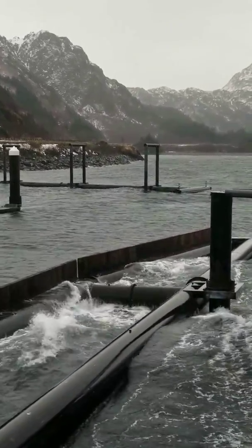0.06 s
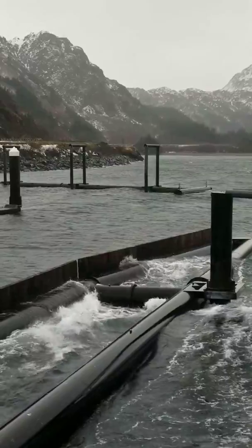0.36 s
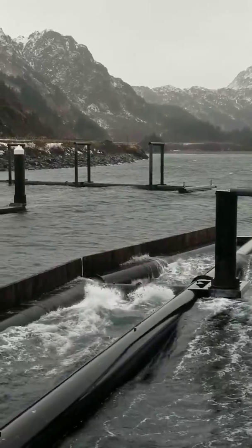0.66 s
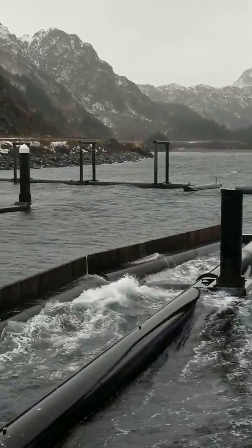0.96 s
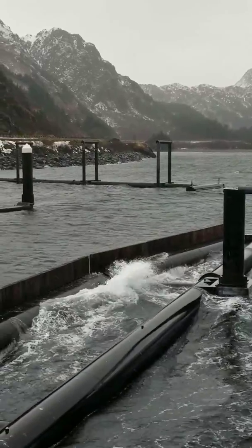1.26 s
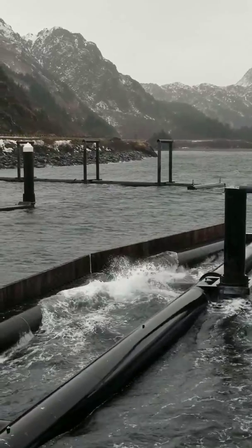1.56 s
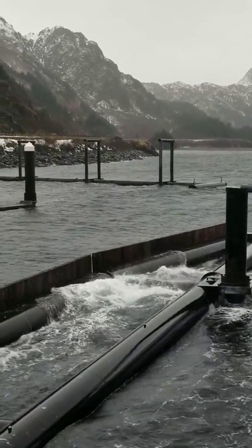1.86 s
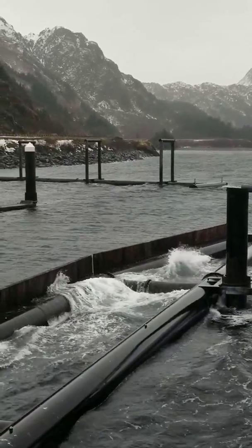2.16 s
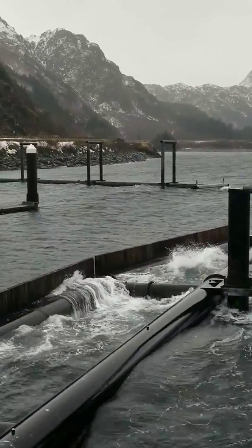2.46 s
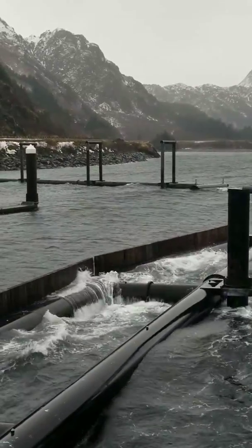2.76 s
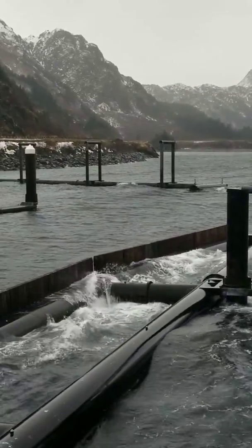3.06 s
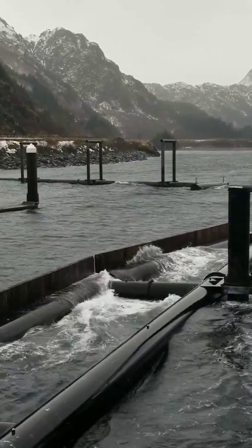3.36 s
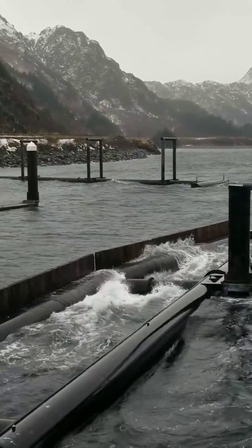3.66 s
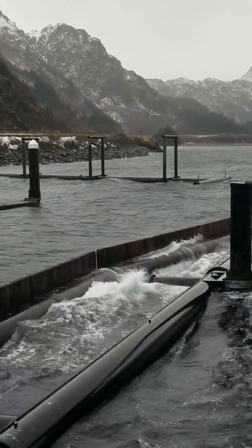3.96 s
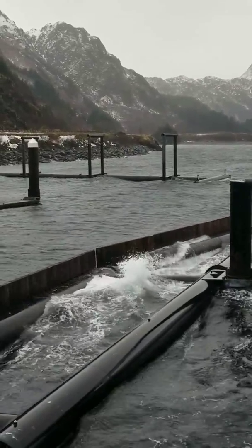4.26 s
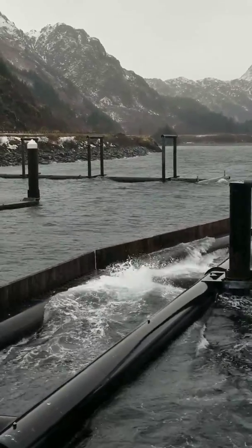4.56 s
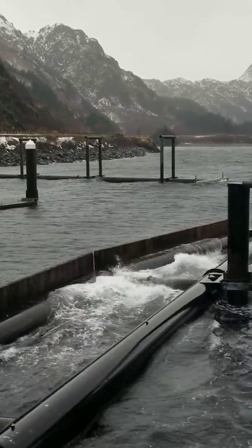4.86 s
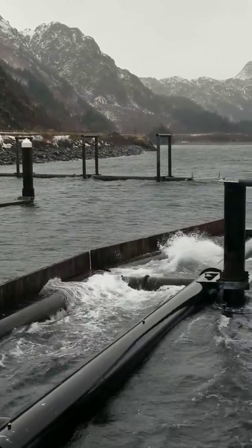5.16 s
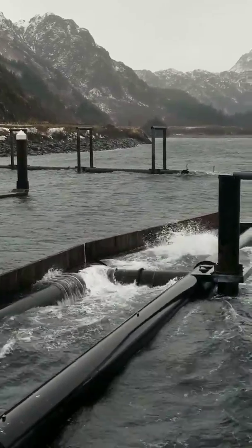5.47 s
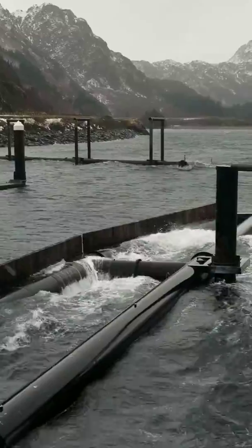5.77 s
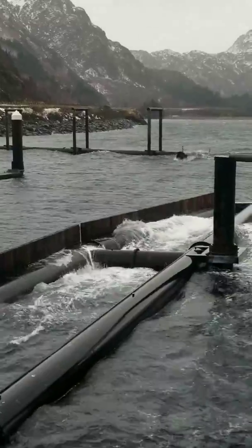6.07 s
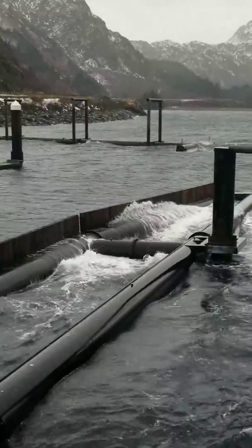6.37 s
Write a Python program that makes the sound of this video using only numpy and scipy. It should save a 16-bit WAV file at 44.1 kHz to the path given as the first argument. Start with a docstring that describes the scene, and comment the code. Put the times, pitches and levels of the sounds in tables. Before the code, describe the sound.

Wind buffets a phone microphone at the shore, rumbling and thumping in uneven gusts. In front, a choppy sea washes over floating pipes with splashes, gurgling bubbles and fizzing foam. Gusts hit about one and two seconds in, the splashing swells around three, and the hardest wind rasps and sputters around four seconds. The wind then eases, leaving the wash, before a last short gust.

```python
"""Gusty wind rumbles on a phone's microphone, over a choppy sea heard from the shore.
Gusts buffet the two microphone openings (ports): single swirls of air (eddies) thump,
the fastest ones sputter, and hard gusts roar and rasp. The sea washes over floating pipes
beside a breakwater, and each wave spills into splashes, ringing bubbles and fizzing foam."""
import sys
import numpy as np
from scipy import signal
from scipy.fft import rfft, irfft
from scipy.io import wavfile
from scipy.ndimage import uniform_filter1d, map_coordinates

SR = 44100
rng = np.random.default_rng(int(sys.argv[2]) if len(sys.argv) > 2 else 0)


def dump_mix(stems):
    """Bounce the given channels to the path in sys.argv[1] as a 16-bit WAV at rate SR."""
    frames = np.atleast_2d(stems).T  # one column per channel
    limited = np.clip(frames, -1, 1)  # hard clip at full scale
    pcm = np.round(limited * 32767).astype(np.int16)
    wavfile.write(sys.argv[1], SR, pcm)


N = 292383
T = np.arange(N) / SR  # the time of every sample, in seconds

# The tone of the wind's rumble, boom and rasp. Each row: frequency in Hz, relative level in dB.
RUMBLE_TONE = [(20, -53), (70, -26.5), (130, -1), (190, 1), (270, 1.5), (370, -2.5), (520, -9.5),
               (750, -22.5), (1100, -25), (1800, -39), (4000, -59)]
BOOM_TONE = [(15, -17), (40, -17), (75, -3.5), (120, -4), (180, -15.5), (300, -20), (1000, -65)]
RASP_TONE = [(150, -4), (400, 4.5), (560, 3.5), (780, 0), (1150, -9), (1800, -18), (2400, -24.5),
             (3800, -37), (5200, -41), (8000, -58), (15000, -64)]
# How much the largest eddies boom and the smallest rasp. Each row: time in seconds, gain in dB.
BOOM_LEVEL = [(0, -9), (1.6, -5.5), (2.8, -10.5), (3.9, -5.5), (4.55, -14.5), (5.25, -14.5), (5.7, -5.5),
              (6.15, -6.5), (6.55, -2.5)]
RASP_LEVEL = [(0, 1), (1.2, 0.5), (2.05, 4), (2.8, -0.5), (3.55, 2), (3.9, 3.5), (4.35, 2.5), (4.6, 2),
              (5.2, -0.5), (6.55, 4.5)]
RASP_POWER = 1.73  # small eddies grow faster than the pressure

def wind():
    """Swirling air presses on each port; faster air makes smaller eddies, so strong gusts rasp."""
    air = airflow()
    knocks, knock_envelope = thumps()
    pressure = np.hypot(air, undb(-9) * knock_envelope)  # each thump drags rough air along
    rumble = air * eddies(RUMBLE_TONE, shared=0.26, smooth_samples=1400) + undb(-1.76) * knocks
    boom = colour(pressure * stereo_noise(shared=0.28), BOOM_TONE) * undb(curve(BOOM_LEVEL))
    tearing = undb(curve(RASP_LEVEL) + 1.44 * waver(240) + waver(30))  # the rasp comes in spurts
    grain = undb(-2.5) * stereo_noise(shared=0.21) + undb(-3) * crackle(pops_per_s=263)
    rasp = colour(pressure ** RASP_POWER * tearing * grain, RASP_TONE)
    return rumble + boom + rasp

# Gusts. Each row: start in seconds, length in seconds, level in dB, left minus right in dB.
GUSTS = [(0.462, 0.079, -32, -3), (.58, 0.024, -22, 10), (0.678, 0.061, -28, 4), (0.859, 0.047, -23, -1.5),
         (1.0, .13, -26.5, 3.5), (1.2, 0.058, -26.5, -3), (1.605, 0.045, -27.5, 1),
         (1.717, 0.075, -29.5, 7), (1.94, 0.026, -25, 12), (1.975, 0.21, -20, -1), (2.21, 0.12, -28.5, -4),
         (2.32, 0.032, -35, 5), (2.475, 0.016, -30.5, -2), (2.68, 0.098, -25, -1.5),
         (2.821, 0.018, -28.5, 1), (3.14, 0.04, -31.5, -0.5), (3.497, 0.066, -23.5, 0),
         (3.567, 0.047, -23.5, 13), (3.668, 0.11, -28, -4), (3.845, 0.076, -18.5, -0.5),
         (3.94, 0.053, -25.5, 14), (4.085, .025, -23, -1), (4.116, 0.042, -16, 1), (4.173, 0.019, -19.5, 6),
         (4.24, 0.3, -20, 2.5), (4.45, 0.16, -19.5, -4.5), (4.645, 0.04, -26.5, 8), (4.755, 0.027, -31, 10),
         (4.989, 0.028, -27.5, 2), (5.218, 0.029, -20, 1), (5.706, 0.093, -34, 0), (6.1, 0.086, -31.5, 4),
         (6.532, 0.079, -24, 0)]
# The light wind between gusts. Each row: time in seconds, level in dB.
BREEZE_LEVEL = [(0, -30.5), (.3, -40), (.6, -30), (1, -35), (1.5, -38), (2.7, -41), (3.6, -37),
                (4.85, -36.5), (5.1, -41), (5.5, -45.5), (6.63, -54)]

def airflow():
    """The pressure on each port: gusts over a light breeze, all wavering and shifting sides."""
    breeze = undb(curve(BREEZE_LEVEL) + 2.6 * waver(18)) * pan(1)
    gusts = surges(GUSTS, rise_s=0.00067, fall_s=0.039)
    return np.hypot(breeze, gusts) * undb(2.37 * waver(55)) * pan(3.5 * wander(35))

# Eddies that thump. Each row: time of the peak in seconds, relative level in dB,
# left minus right in dB, centre pitch in Hz, width in milliseconds.
THUMPS = [(.097, -15, 3, 271, 7.3), (.607, -15, -1, 248, 6.1), (.702, -8.5, 4, 320, 6.7),
          (0.732, -11.5, -2, 281, 12), (0.773, -8.5, -3, 285, 10.5), (.891, -5, 4, 301, 3.4),
          (0.908, -13, 2, 290, 4.5), (1.035, -8, 6, 316, 4.9), (1.118, -11, -5, 256, 7.7),
          (1.138, -10.5, 0, 277, 9), (1.625, -12, 7, 297, 10), (1.644, -14, 7, 340, 3.7),
          (1.979, -19, -15, 321, 3.7), (2.008, -12, 7, 262, 4.8), (2.031, -6.5, 4, 326, 5.7),
          (2.065, -10, 3, 293, 13), (2.093, -9, 6, 230, 4.2), (2.112, -2.5, 4, 261, 3.2),
          (2.122, -7.5, 15, 480, 3.2), (2.177, -4, -4, 290, 3.2), (2.206, -15, -11, 273, 5),
          (2.688, -21, 0, 292, 6.9), (2.719, -15, 9, 305, 19), (3.571, -5.5, 4, 333, 7),
          (3.598, -8.5, 16, 287, 5), (3.806, -6.5, 7, 270, 7.8), (3.835, -7.5, -5, 306, 5.2),
          (3.853, -7, -5, 324, 3.2), (3.875, -2, 9, 463, 3.7), (3.89, -4.5, 7, 400, 2.5),
          (3.908, -3, 5, 305, 9.6), (3.964, -6.5, -1, 330, 7.8), (4.122, -7.5, 3, 335, 6),
          (4.136, -7.5, 0, 330, 9), (4.151, -4, 0, 398.3, 3.4), (4.184, -5, 2, 424, 3.5),
          (4.198, -9, 1, 250, 6.3), (4.231, -2.5, -3, 303, 4.6), (4.254, -0.5, 7, 389, 3.5),
          (4.342, -4.5, 0, 341, 3), (4.407, -11.5, 5, 368, 18), (4.479, -8.5, 1, 332, 16),
          (4.512, -6.5, -3, 400, 8.1), (4.532, 0, 4, 285, 7.1), (4.562, -3, 5, 385, 2.7),
          (4.593, -8, 9, 270, 5.5), (4.599, -4, 2, 382, 10.4), (4.784, -12, 3, 323, 9.5),
          (5.232, -10, -2, 300, 8.6), (5.247, -9.5, -3, 260, 13), (6.536, -13.5, 1, 396, 6.8),
          (6.541, -9, 0, 167, 13), (6.572, -6, 7, 335, 8), (6.614, -14.5, -1, 380, 7.3)]
WOBBLE_OCTAVES, PORT_LEAD_RADIANS = 0.3, 0.65

def thumps():
    """Large eddies push or suck at the ports and shake them; returns the sound and its envelope."""
    sound, envelope = np.zeros((2, 2, N))
    wobble = 2 ** (WOBBLE_OCTAVES * wander(330))
    for peak_s, db, pan_db, hz, width_ms in THUMPS:
        at, shape = puff(peak_s, width_ms)
        push, lead = rng.choice([-1, 1], size=2)
        phase = 2 * np.pi * np.cumsum(hz * wobble[at]) / SR
        phase -= phase[np.argmax(shape)]
        port_shift = lead * PORT_LEAD_RADIANS * np.array([[1], [-1]])  # one leads, one trails
        strength = undb(db) * pan(pan_db) * shape
        sound[:, at] += push * strength * np.cos(phase + port_shift)
        envelope[:, at] += strength
    return sound, envelope

# Sharp sputters of air. Each row: time of the peak in seconds, relative level in dB,
# left minus right in dB, width in milliseconds.
SPUTTERS = [(1.07, -26, 8, 8), (1.646, -19, 10, 3.5), (1.725, -25.5, 21, 7.3), (1.95, -26, 12, 7.7),
            (1.995, -31, -3, 4), (2.028, -30, -3, 4.4), (2.063, -27.5, 3, 10), (2.113, -21, 10, 2.5),
            (2.122, -24, 8, 1.5), (2.132, -21, 12, 2.8), (2.177, -27, -2, 2), (2.184, -27, -1, 2.3),
            (2.672, -23.5, 14, 5.2), (3.495, -21.5, 13, 3), (3.582, -25, 8, 4), (3.598, -21.5, 14, 5.9),
            (3.684, -26, 7, 2.2), (3.854, -18, -7, 1.4), (3.876, -16, 11, 3), (3.884, -27, 8, 8),
            (3.9, -23, 10, 8.1), (3.966, -29, 5, 4), (4.005, -20.5, 14, 12), (4.018, -25, 12, 3.3),
            (4.14, -30, 1, 6), (4.151, -24, 1, 3), (4.186, -28, 2, 2.7), (4.254, -20, 7, 1.4),
            (4.264, -23, 8, 1.7), (4.285, -26, 11, 8), (4.293, -22.5, 15, 3.5), (4.341, -26.5, 12, 4.7),
            (4.356, -29, 6, 3.2), (4.408, -26.5, 6, 6.4), (4.51, -26, 2, 3), (4.529, -34, -4, 4),
            (4.562, -27, 4, 3), (4.6, -26, 12, 6), (4.71, -28.5, 12, 5.1), (4.779, -32, 8, 12),
            (4.906, -32, 5, 7.3), (4.942, -30, 15, 15), (6.574, -28, 12, 9)]
# Their tone. Each row: frequency in Hz, relative level in dB.
SPUTTER_TONE = [(150, 1.5), (400, 13.5), (1000, 7.5), (1900, 3.5), (2500, -7), (3700, -8), (5100, -16),
                (6500, -21), (15000, -46)]

def sputters():
    """A fast eddy catches the edge of a port, snaps and crackles for a moment."""
    envelope, snaps = np.zeros((2, 2, N))
    for peak_s, db, pan_db, width_ms in SPUTTERS:
        at, shape = puff(peak_s, width_ms)
        gain = undb(db) * pan(pan_db)
        envelope[:, at] += gain * shape
        snaps[:, int(peak_s * SR)] += gain[:, 0] * rng.choice([-1, 1])
    crackling = envelope * eddies(SPUTTER_TONE, shared=0.66, smooth_samples=200)
    return undb(1) * crackling + undb(2) * colour(snaps, SPUTTER_TONE)

def eddies(tone, shared, smooth_samples):
    """Swirling air flutters on both ports; its power evens out over a few eddies."""
    flutter_db = 3.2 * wander(110) + 2 * np.array([wander(160), wander(160)])
    air = colour(stereo_noise(shared) * undb(flutter_db), tone)
    power = uniform_filter1d(np.mean(air ** 2, axis=0), size=smooth_samples)
    return air / np.sqrt(power)

def puff(peak_s, width_ms, rise_share=0.42):
    """One eddy swells and fades as it passes a port; returns its sample positions and envelope."""
    at = np.arange(max(int((peak_s - .05) * SR), 0), min(int((peak_s + .1) * SR), N))
    from_peak = (T[at] - peak_s) / (width_ms / 1000)
    share = np.where(from_peak < 0, rise_share, 1 - rise_share)
    return at, 1 / np.cosh(np.arccosh(2) * from_peak / share)

def crackle(pops_per_s):
    """Tiny scattered pops in the rasp, each somewhere between left and right."""
    chance, sign, side = rng.random((3, N))
    pops = (chance < pops_per_s / SR) * np.sign(sign - .5)
    return unit(pops * np.sqrt([side, 1 - side]))

# Lingering foam and water plunging off the pipes. Each row: time in seconds, relative level in dB.
FOAM_LEVEL = [(0, -46.5), (.55, -48.5), (.7, -56.5), (.85, -51), (1.25, -49.5), (1.6, -54), (2.3, -48.5),
              (2.7, -47), (2.83, -49), (2.95, -46), (3.47, -47.5), (3.55, -49.5), (4.5, -55.5), (4.75, -55),
              (5.35, -53.5), (5.7, -49.5), (6.2, -46), (6.63, -48)]
PLUNGE_LEVEL = [(0, -47.5), (.55, -47.5), (.8, -52), (1.25, -51.5), (1.45, -46.5), (1.8, -49.5),
                (2.15, -49.5), (2.35, -51.5), (2.65, -46), (2.8, -49), (2.9, -48.5), (3.08, -44),
                (3.45, -42.5), (3.7, -49), (4.2, -49.5), (4.7, -53.5), (5.35, -56.5), (5.8, -51),
                (6.25, -48.5), (6.63, -50)]
# Waves that spill over a pipe and froth.
# Each row: start in seconds, length in seconds, relative level in dB, left minus right in dB.
SPILLS = [(0, 0.018, -44, -3), (.09, 0.11, -55, 2), (.36, 0.048, -52, 1), (.79, 0.12, -54, 0),
          (.925, 0.065, -48.5, 0), (1.04, 0.03, -53, 0), (1.1, 0.054, -52.5, 0), (1.315, 0.1, -49.5, 1),
          (1.82, 0.11, -49, 0), (2.05, 0.03, -49, 0), (2.52, 0.14, -54, 0), (2.94, 0.027, -44, 0),
          (3.03, 0.42, -48.5, -2), (3.15, 0.29, -48.5, 1), (3.75, 0.089, -46.5, -1), (5.07, 0.09, -52.5, 0),
          (5.74, .015, -53, 3), (6.08, 0.17, -56, 1), (6.48, .045, -47, 0)]
SPRAY_SHARE = 0.58  # how far the spray follows the plunging water rather than the foam

def sea():
    """Waves froth over the pipes, plunge off them and throw spray, while the water heaves below."""
    froth = surges(SPILLS, rise_s=0.0049, fall_s=0.036)
    fizz_db = 20 * np.log10(np.hypot(undb(curve(FOAM_LEVEL)), froth))
    plunge_db = curve(PLUNGE_LEVEL)
    spray_db = fizz_db + SPRAY_SHARE * (plunge_db - fizz_db)
    return foam(fizz_db) + splash(plunge_db) + spray(spray_db) + plinks(plunge_db) + churn()

# The water heaving under the foam. Each row: time in seconds, relative level in dB.
HEAVE_LEVEL = [(0, -33.5), (.5, -34.5), (1, -37.5), (1.5, -34.5), (2, -38.5), (2.5, -37), (3, -37.5),
               (3.4, -33), (4, -37), (4.6, -38), (5, -43.5), (5.4, -42), (5.8, -38), (6.2, -34.5),
               (6.63, -36)]
# Its tone. Each row: frequency in Hz, relative level in dB.
CHURN_TONE = [(25, 1.5), (70, -3), (220, 3.5), (350, -1.5), (470, -6), (750, -5.5), (1100, -8.5),
              (1900, -14.5), (2600, -41), (4700, -28), (6000, -36)]

def churn():
    """Heaving water traps larger pockets of air that gurgle."""
    gurgle = bubbles(low_hz=300, high_hz=1200, cycles=12, spread_db=2.2, count=1200)
    water = colour(stereo_noise(shared=0.3) + undb(-11) * gurgle, CHURN_TONE)
    return water * undb(curve(HEAVE_LEVEL) - 4 + 2.15 * wander(13))

# The tone of the foam and of its finest pops. Each row: frequency in Hz, relative level in dB.
FOAM_TONE = [(1500, 4), (2700, 5.5), (3600, 6), (5000, 5.5), (5700, -0.5), (6600, 3.5), (7300, -0.5),
             (7900, 3.5), (9000, -3), (10300, -2), (11800, 0), (15500, -2)]
FINE_POP_TONE = [(3000, -38), (6000, -2), (8000, -2.5), (12000, -8), (15500, 2.5)]
FOAM_SPLIT_HZ = 5200  # between coarse and fine bubbles

def foam(level_db):
    """Countless tiny bubbles burst in coarse and fine patches; the finest prickle on their own."""
    beads = bubbles(low_hz=3000, high_hz=13000, cycles=70, spread_db=2.4, count=2500)
    hiss = colour(stereo_noise(shared=0.18) + undb(-9.5) * beads, FOAM_TONE)
    coarse = signal.sosfiltfilt(signal.butter(2, FOAM_SPLIT_HZ, fs=SR, output="sos"), hiss)
    fine = hiss - coarse
    fizz = coarse * undb(1.64 * waver(22)) + fine * undb(waver(26))
    pops = rng.standard_normal((2, N)) * (rng.random((2, N)) < .02)
    prickle = colour(unit(pops), FINE_POP_TONE) * undb(-8.5 + 2.1 * wander(30))
    flicker = np.hypot(1, undb(-11.5) * flicks(per_s=36, fade_s=0.006))
    return (fizz + prickle) * flicker * undb(level_db + 4.5)

def flicks(per_s, fade_s):
    """The envelope of tiny splashes that flash up at random, left or right, and die at once."""
    chance, size, side = rng.random((3, N))
    starts = (chance < per_s / SR) * size ** 2 * np.array([side, 1 - side])
    fade = [1, -np.exp(-2 / (fade_s * SR))]
    power = signal.lfilter([1], fade, signal.lfilter([1], fade, starts))
    return unit(np.sqrt(power + 1e-12))

# The tone of the plunging water. Each row: frequency in Hz, relative level in dB.
SPLASH_TONE = [(400, -6.5), (800, -2.5), (1120, -2), (1300, 1.5), (1520, 6.5), (1700, 5.5), (1920, 4),
               (2200, -5.5), (2750, -14), (3650, -14.5), (7000, -42)]

def splash(level_db):
    """Sheets of water plunge off the pipes and drive bubbles under."""
    spatter = stereo_noise(shared=0.96) * undb(2.4 * waver(90))
    rings = bubbles(low_hz=800, high_hz=2300, cycles=18, spread_db=3, count=3500)
    patches = undb(.7 * wander(20))
    return colour(spatter + undb(-8) * rings, SPLASH_TONE) * undb(level_db + 1.37) * patches

# Slops of water over a pipe. Each row: start in seconds, relative level in dB, left minus right in dB.
SLOPS = [(.03, -39.5, -1), (.375, -36.5, 1), (.415, -56, 2), (1.345, -43, 1), (1.395, -49, 0),
         (2.03, -44, 0), (2.1, -46, 1), (2.325, -46, 0), (2.38, -42, 0), (2.52, -42.5, -1), (2.9, -41, 0),
         (3.15, -43, 0), (3.27, -45, 0), (3.35, -39, -4), (3.42, -39, 0)]
# The tone of the falling droplets. Each row: frequency in Hz, relative level in dB.
SPRAY_TONE = [(1200, -14), (1950, 5.5), (2550, -6), (3200, 1.5), (3650, 2), (4000, 0), (4350, -6.5),
              (5050, -4.5), (5700, -7), (9000, -15.5)]

def spray(level_db):
    """Thrown droplets patter back on the water, thickest just after each slop."""
    patter = stereo_noise(shared=0.91) * undb(1.9 * waver(80))
    drops = bubbles(low_hz=2400, high_hz=5600, cycles=30, spread_db=3.3, count=4500)
    patches = undb(level_db - 0.76 + 1.1 * wander(20))
    slops = undb(-4) * bursts(SLOPS, rise_s=0.017, fall_s=0.023)
    return colour(patter + undb(-5.5) * drops, SPRAY_TONE) * np.hypot(patches, slops)

# The tone of bubbles that ring clear of the wash. Each row: frequency in Hz, relative level in dB.
PLINK_TONE = [(700, -2), (1200, 5), (1700, 5), (2500, -11), (3600, 3), (4400, -5), (5100, -1.5), (7000, -9)]

def plinks(level_db):
    """Here and there one bubble or drop rings out above the rest."""
    rings = bubbles(low_hz=750, high_hz=7000, cycles=45, spread_db=2.6, count=900)
    return unit(colour(rings, PLINK_TONE)) * undb(level_db - 6)

# Thin ticks. Each row: start in seconds, relative level in dB, left minus right in dB.
TICKS = [(1.3354, -34, 1.5), (3.918, -32, 4), (4.0013, -34, 3.0), (6.5224, -36, 0.0)]

def ticks():
    """Brief, very high ticks stand out of the fizz."""
    clicks = stereo_noise(shared=0.5) * bursts(TICKS, rise_s=.0015, fall_s=0.0022)
    return undb(-0.5) * colour(clicks, FINE_POP_TONE)

def bubbles(low_hz, high_hz, cycles, spread_db, count):
    """Bubbles of many sizes ring briefly, rising in pitch as they near the surface."""
    out = np.zeros((2, N + SR))
    for when, pitch, chance, side, lag in rng.random((count, 5)):
        hz = low_hz * (high_hz / low_hz) ** pitch
        age = np.linspace(0, 1, int(cycles * SR / hz) + 2)
        ring = np.sin(2 * np.pi * cycles * age * (1 + age / 10)) * np.exp(-5 * age)
        ring *= undb(-spread_db * np.log(chance + .01)) * hz / high_hz  # a few are much louder
        left = int(when * N) + 20
        right = left + int((lag - .5) * 40)  # up to 20 samples earlier or later
        out[0, left:left + len(ring)] += np.sqrt(side) * ring
        out[1, right:right + len(ring)] += np.sqrt(1 - side) * ring
    return unit(out[:, :N])

def surges(table, rise_s, fall_s):
    """The left and right envelope (strength over time) of surges that rise, hold and die away."""
    power = np.zeros((2, N))
    for start_s, length_s, db, pan_db in table:
        first = max(int(start_s * SR), 0)
        age = T[:min(N - first, SR)]
        shape = (1 - np.exp(-age / rise_s)) * np.exp(-np.maximum(age - length_s, 0) / fall_s)
        power[:, first:first + len(age)] += (undb(db) * pan(pan_db) * shape) ** 2
    return np.sqrt(power)

def bursts(table, rise_s, fall_s):
    """The left and right envelope of short bursts that rise and fade at once."""
    out = np.zeros((2, N))
    for start_s, db, pan_db in table:
        first = int(start_s * SR)
        age = T[:min(N - first, SR // 5)]
        shape = (1 - np.exp(-age / rise_s)) * np.exp(-age / fall_s)
        out[:, first:first + len(age)] += undb(db) * pan(pan_db) * shape / shape.max()
    return out

def colour(x, tone):
    """Filter a sound to follow a tone table; white noise keeps its power."""
    hz, db = np.transpose(tone)
    size = 8192
    bin_hz = np.arange(size // 2 + 1) * SR / size
    gain = unit(undb(np.interp(np.log(bin_hz + 1), np.log(hz), db)))
    # folding the cepstrum makes the filter ring only after a sound, never before it
    cepstrum = irfft(np.log(gain))
    cepstrum[1:size // 2] *= 2
    cepstrum[size // 2 + 1:] = 0
    response = irfft(np.exp(rfft(cepstrum)))
    return signal.oaconvolve(x, response[None, :size // 2], axes=1)[:, :N]

def wander(rate):
    """A smooth random curve of typical size 1 that changes about rate times a second."""
    steps = rng.standard_normal(4096)
    steps -= uniform_filter1d(steps, size=7)  # take out slow drift
    times = T[::16]
    smooth = map_coordinates(steps, [times * rate], order=2, mode="wrap")
    return unit(np.interp(T, times, smooth))

def waver(rate):
    """Like wander, but without the rare big swings."""
    return unit(np.tanh(wander(rate)))

def stereo_noise(shared):
    """Left and right noise; shared (0 to 1) says how much is the same in both."""
    common = np.sqrt(shared) * rng.standard_normal(N)
    return common + np.sqrt(1 - shared) * rng.standard_normal((2, N))

def pan(pan_db):
    """Left and right gains that lie pan_db apart and keep the total power."""
    return unit(undb(np.array([pan_db, -pan_db]) / 2).reshape(2, -1))

def curve(table):
    """Join rows of time and level with straight lines, giving a level at every sample."""
    return np.interp(T, *np.transpose(table))

def undb(db):
    """Turn decibels into a gain."""
    return 10 ** (np.asarray(db) / 20)

def unit(x):
    """Scale a signal to an average power of 1."""
    return x / np.sqrt(np.mean(x ** 2))

def scene():
    """The sea in front, the wind on the microphone."""
    return sea() + ticks() + wind() + sputters()

LOW_CUT_HZ, HIGH_CUT_HZ = 31, 15750

def record(dry):
    """The phone thins the deepest bass, rounds the loudest peaks and cuts the highest treble."""
    thinned = signal.sosfilt(signal.butter(2, LOW_CUT_HZ, "high", fs=SR, output="sos"), dry)
    rounded = thinned / (1 + thinned ** 6) ** (1 / 6)
    return signal.sosfilt(signal.ellip(12, .1, 80, HIGH_CUT_HZ, fs=SR, output="sos"), rounded)

dry = scene()
out = record(dry)
dump_mix(out)
```